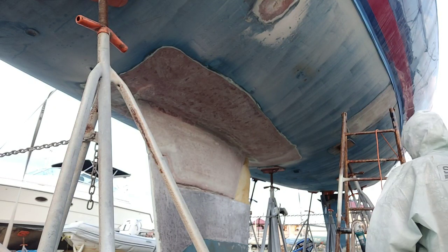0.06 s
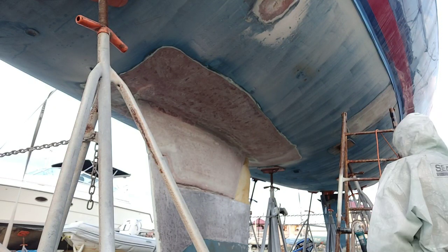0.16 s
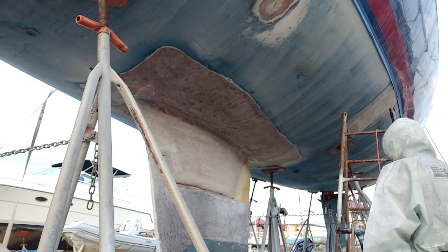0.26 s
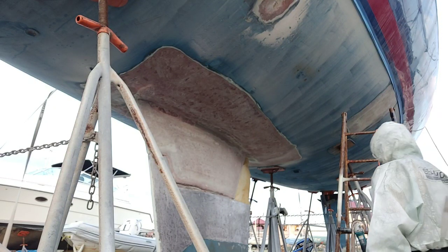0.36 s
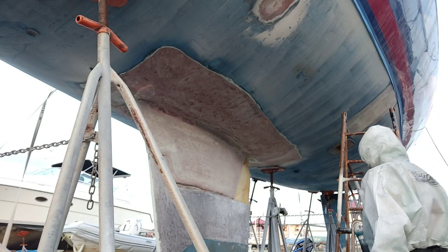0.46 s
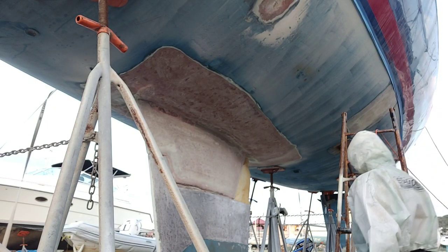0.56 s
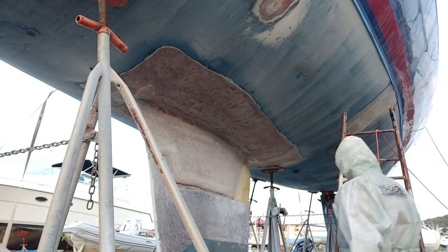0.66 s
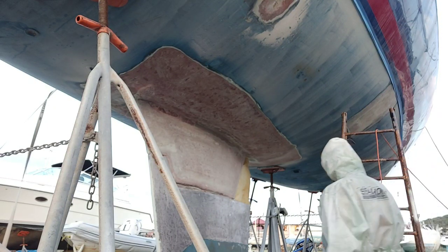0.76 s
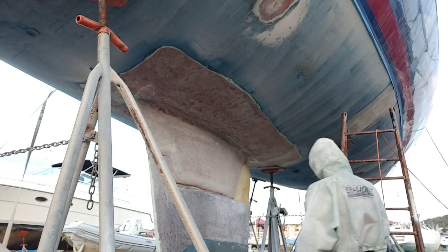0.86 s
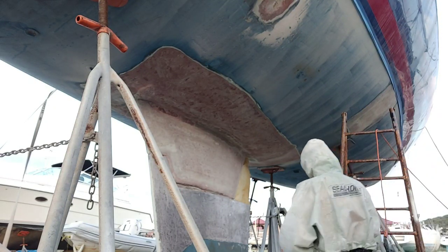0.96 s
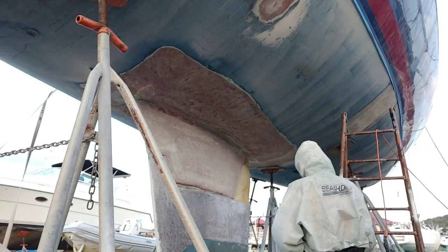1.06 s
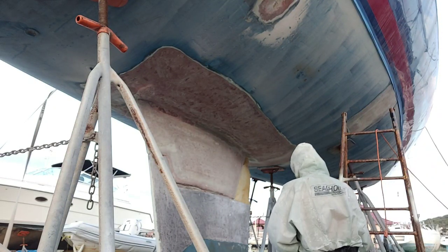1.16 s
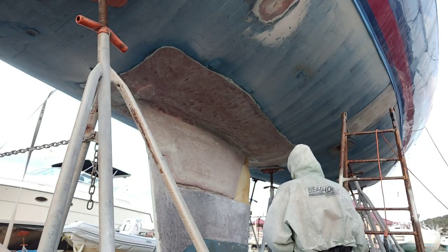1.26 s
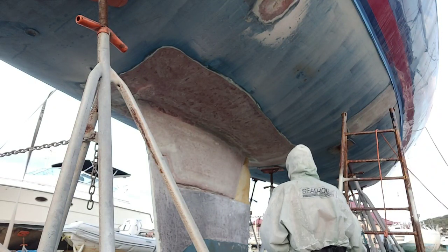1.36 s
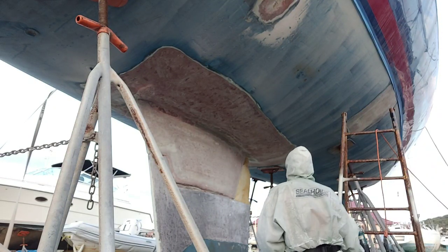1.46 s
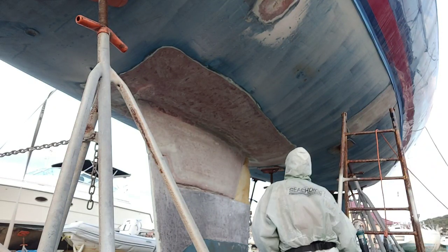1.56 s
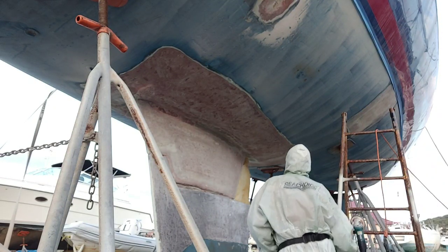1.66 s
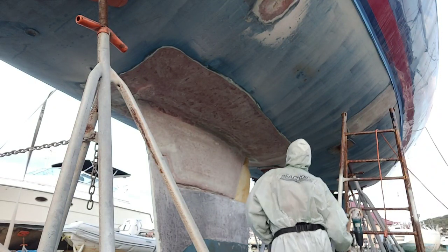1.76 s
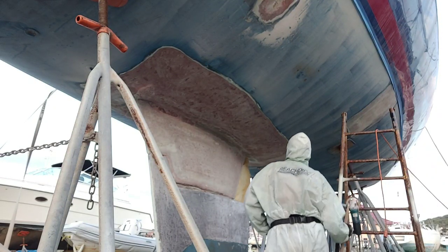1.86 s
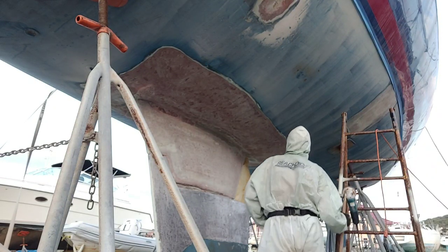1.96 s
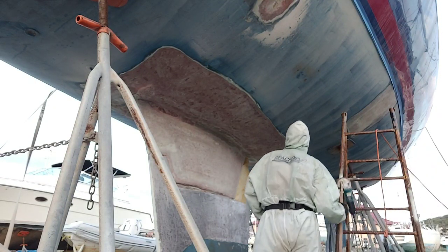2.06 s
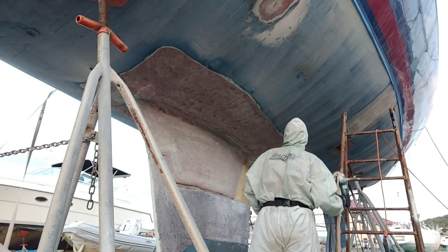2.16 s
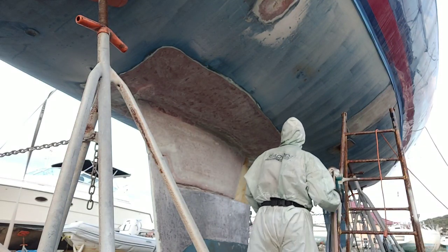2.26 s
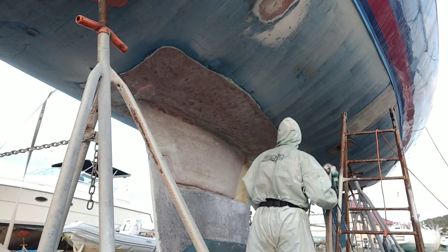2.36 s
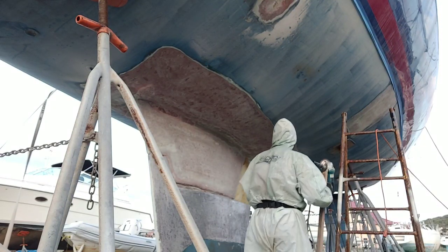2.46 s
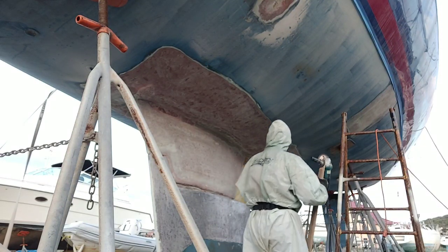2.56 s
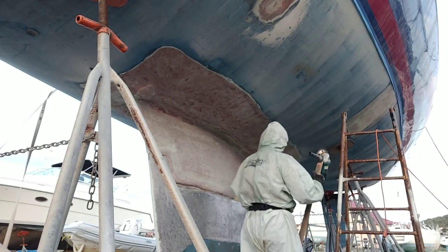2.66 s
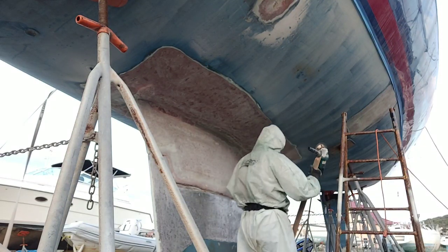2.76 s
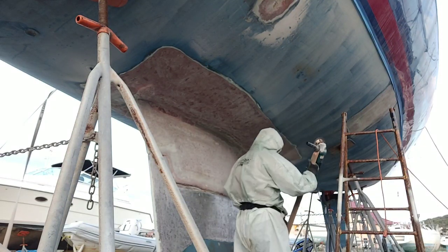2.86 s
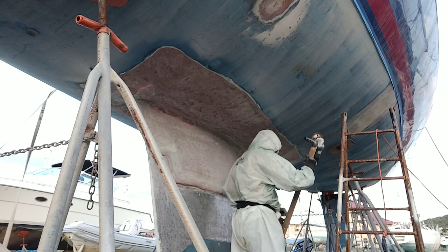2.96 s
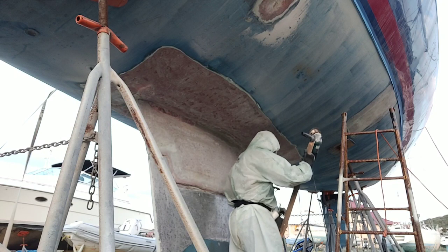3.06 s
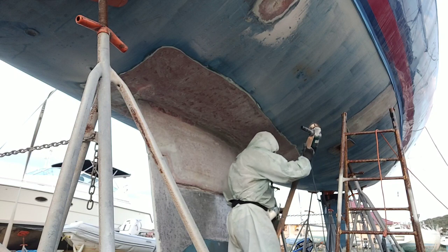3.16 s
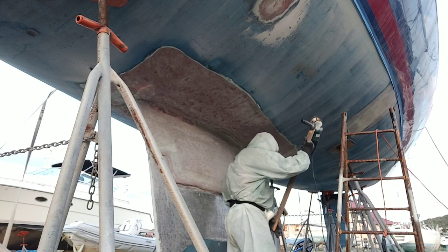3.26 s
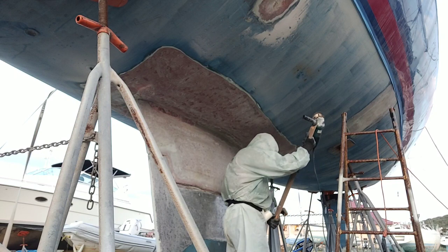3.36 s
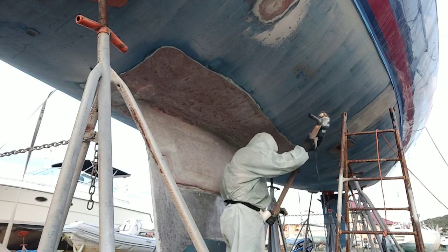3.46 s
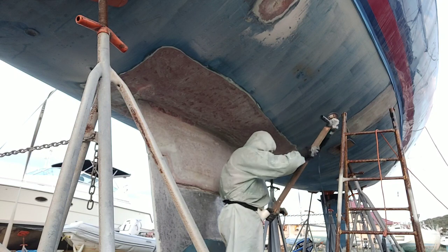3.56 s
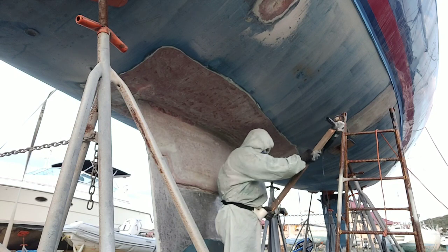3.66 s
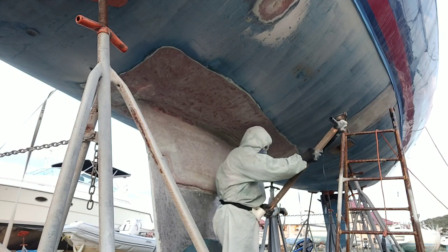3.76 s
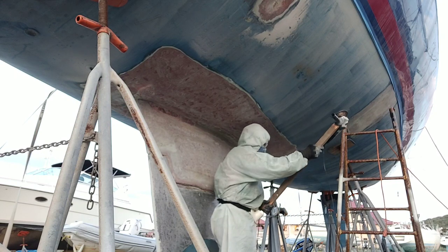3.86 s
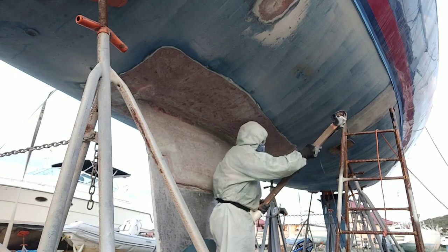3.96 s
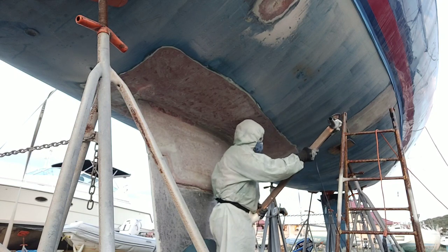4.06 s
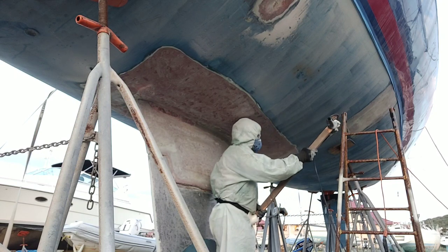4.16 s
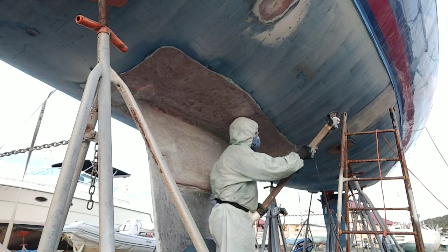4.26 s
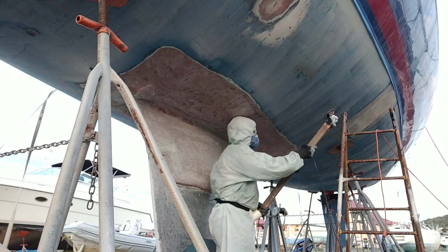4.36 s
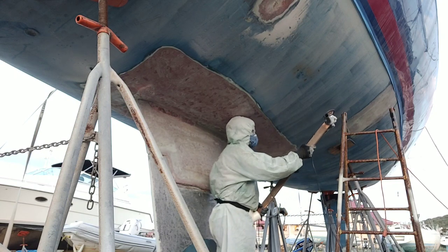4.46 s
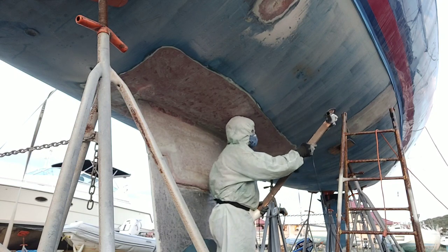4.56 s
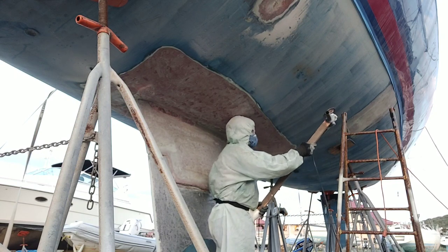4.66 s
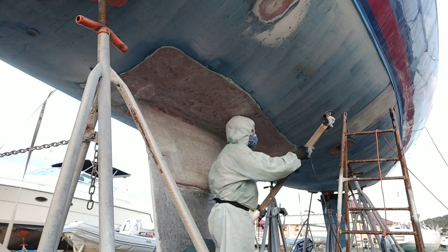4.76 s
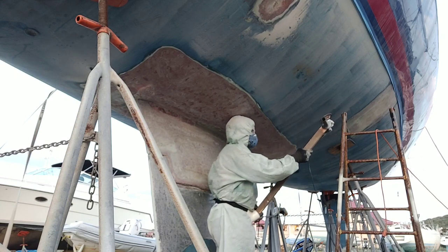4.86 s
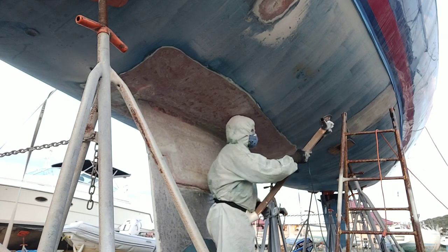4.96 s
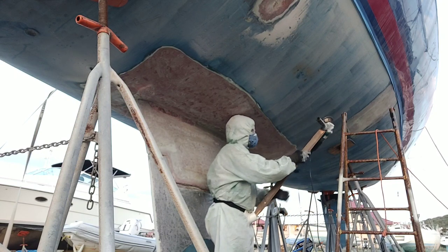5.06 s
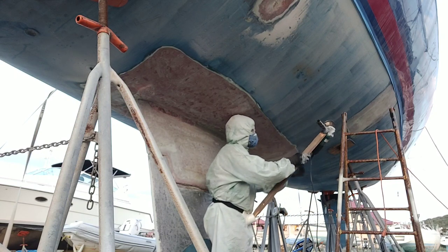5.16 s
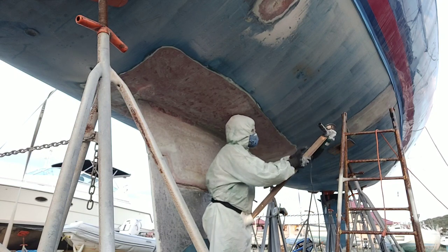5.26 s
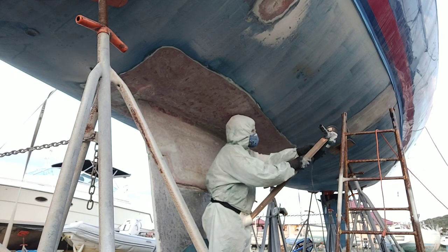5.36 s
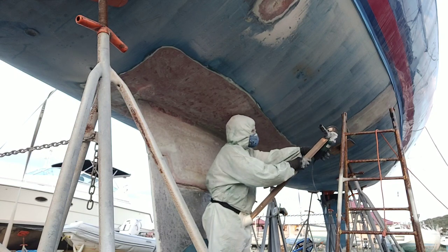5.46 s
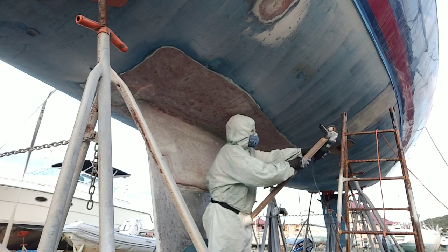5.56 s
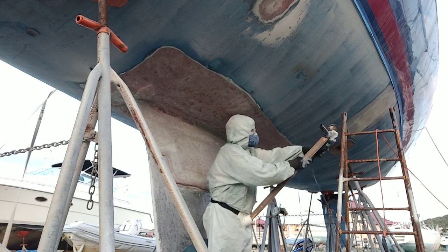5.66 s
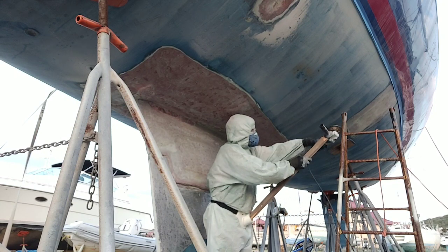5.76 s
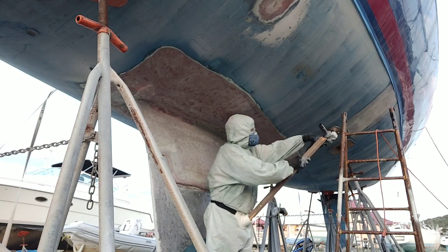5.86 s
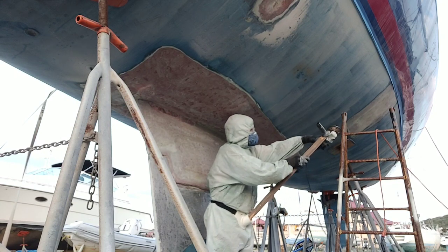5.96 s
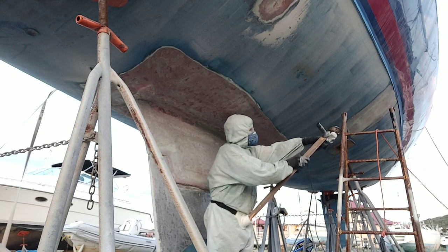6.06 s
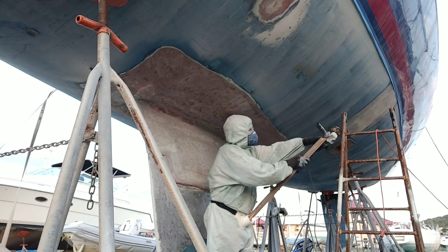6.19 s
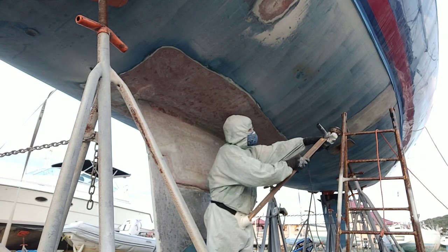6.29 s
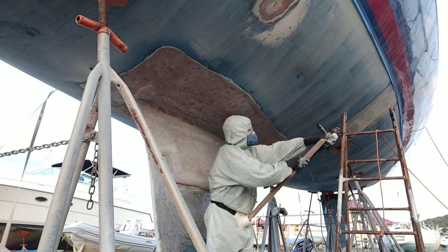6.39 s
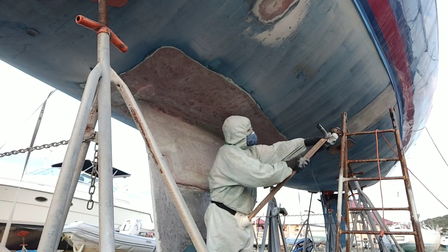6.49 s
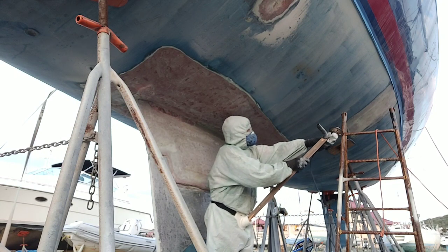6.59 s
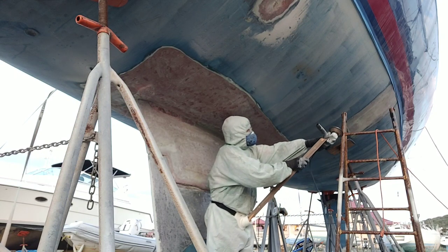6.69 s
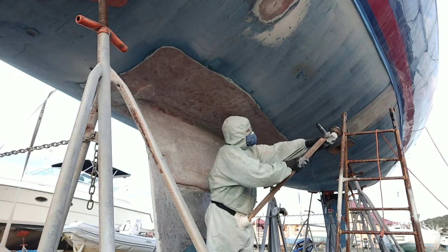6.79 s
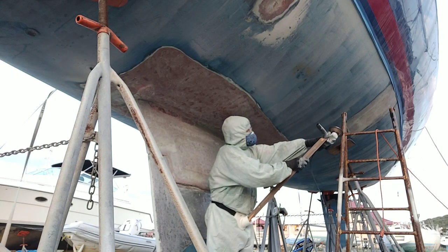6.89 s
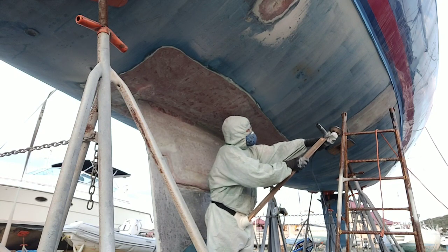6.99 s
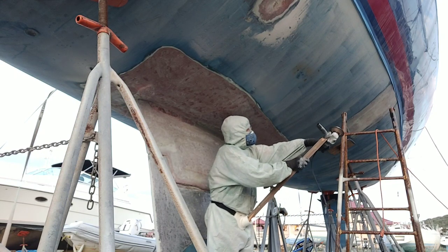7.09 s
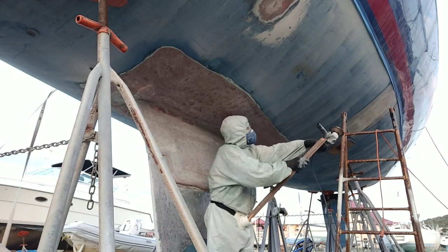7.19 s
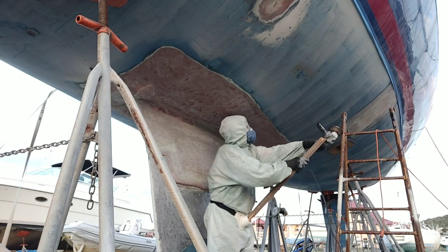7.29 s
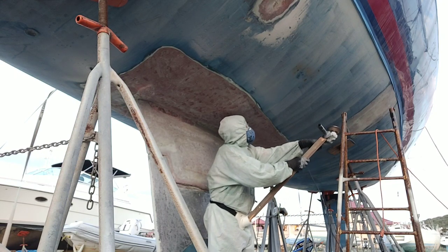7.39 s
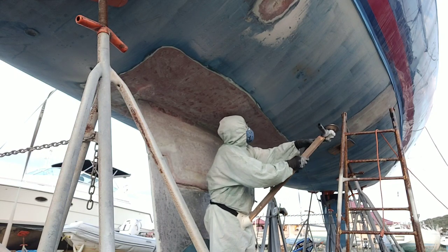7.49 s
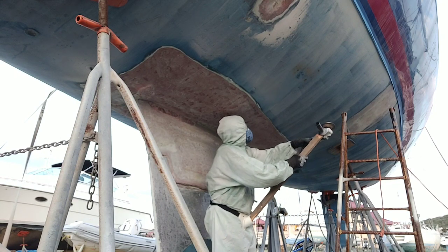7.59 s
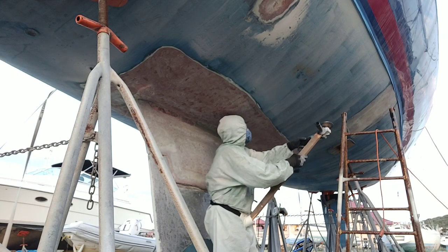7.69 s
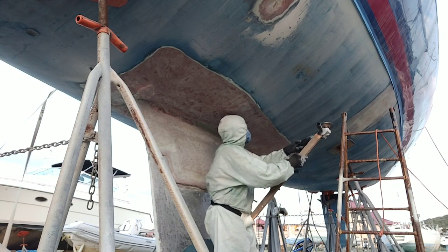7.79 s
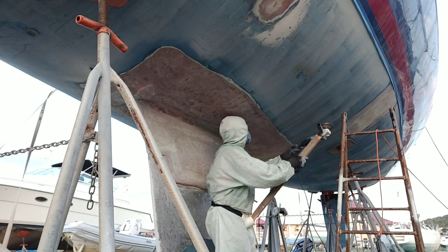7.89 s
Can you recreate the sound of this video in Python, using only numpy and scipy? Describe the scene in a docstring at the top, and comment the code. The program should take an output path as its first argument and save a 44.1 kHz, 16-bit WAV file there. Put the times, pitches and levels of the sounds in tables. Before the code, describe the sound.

Very quiet open boatyard beneath a hull: soft distant rumble and thin hiss. Around 0.7-0.9 s faint taps mix with soft footfalls and a rustle of overalls. A clearer woody knock comes at 1.4 s, then a loose steel part clinks in a quick bouncing cluster at 1.55-1.65 s, ringing bright and short. At about 2.5 s a firm double knock on the pole lands with a low thud, followed by a lighter tick and steps near 3 s. Duller knocks follow at 4.0 and 4.4 s, with weak taps to 4.8 s and a tiny scuff at 5.2 s. The background swells slightly from 6 s. At 6.7 s a switch snaps and the grinder erupts, enormously louder: pulsing, rattling gears and ringing metal, a brief squeal, then the clatter drops after 7.3 s as a shrill rushing whine climbs, running until the cut near 7.9 s.

```python
"""A boat yard, under a hull: a worker walks about with an angle grinder tied to a wooden pole.
Knocks are noise bursts ringing the pole, a loose steel part clinks as decaying modes, steps are thuds and swishes.
Switched on, the grinder clatters as torque pulses drive noise through its resonances, then winds up
into a shrill rush of gear noise, air and tones that climb with the motor.
Sparse echoes throw tool and knocks back from the hull, over far rumble and thin hiss."""
import sys
import numpy as np
from scipy import signal
from scipy.fft import rfft, irfft
from scipy.io import wavfile

SR = 44100
rng = np.random.default_rng(int(sys.argv[2]) if len(sys.argv) > 2 else 0)


def waveform_to_disk(signal):
    """Save audio, clipped to [-1, 1], as 16-bit WAV at the path in sys.argv[1]."""
    frames = np.transpose(np.atleast_2d(signal))
    scaled = np.clip(frames, -1, 1) * 32767
    samples = np.round(scaled).astype(np.int16)
    wavfile.write(sys.argv[1], SR, samples)


N = 349713
TIME = np.arange(N) / SR
FREQS = np.maximum(np.fft.rfftfreq(N, 1 / SR), 1)
SWITCH_ON_S, MAINS_HZ = 6.697, 60
INRUSH_S = 0.4  # decay time constant of the starting current


def from_db(db):
    """Decibels to gain."""
    return 10 ** (np.asarray(db) / 20)


def rms_one(x):
    """Scale to unit power."""
    return x / np.sqrt(np.mean(np.abs(x) ** 2) + 1e-20)


def in_time(rows):
    """Draw a curve of (time [s], value) at every sample."""
    return np.interp(TIME, *np.transpose(rows))


def colour(x, spectrum):
    """Give a steady sound a spectrum, at unit power."""
    hz, db = np.transpose(spectrum)
    gain = from_db(np.interp(np.log(FREQS), np.log(hz), db))
    return rms_one(irfft(rfft(x) * gain, N))


def band(x, low_hz, high_hz, order=2):
    """Causal band-pass."""
    edges = [low_hz, min(high_hz, SR * 0.45)]
    return signal.sosfilt(signal.butter(order, edges, "band", fs=SR, output="sos"), x)


def drift(rate):
    """Smooth random wander with unit spread; rate in Hz."""
    control_rate = 4000
    r = np.exp(-2 * np.pi * rate / control_rate)
    slow = signal.lfilter([1], [1, -2 * r, r * r], rng.standard_normal(40000))
    slow = rms_one(slow[-32000:])  # drop the filter's settling
    return np.interp(TIME, np.arange(len(slow)) / control_rate, slow)


def resonate(x, modes):
    """Ring parallel resonances of alternating sign."""
    out = 0
    for k, (hz, width, db) in enumerate(modes):
        r = np.exp(-np.pi * width / SR)
        zeros = np.array([1, 0, -1]) * (1 - r * r) / 2
        poles = [1, -2 * r * np.cos(2 * np.pi * hz / SR), r * r]
        out = out + (-1) ** k * from_db(db) * signal.lfilter(zeros, poles, x + 1e-18)
    return out


# Motor run-up, a quick kick and a slow climb: (speed gained [turns/s], time constant [s])
SPIN_UP = [(156, .095), (394, .4)]


def motor_speed(running):
    """Turns per second, closing on free speed as two exponential approaches."""
    return sum(gain * (1 - np.exp(-running / lag_s)) for gain, lag_s in SPIN_UP)


def impacts(turns, surge, depth, spread_db, per_turn=0.07):
    """Dense tooth contacts of uneven strength, harder at each surge of torque and once a turn."""
    sizes = rng.standard_normal(N) * from_db(spread_db * drift(270))
    return sizes * (1 + depth * surge) * (1 + per_turn * np.cos(2 * np.pi * turns))


# Low clatter over time, before trim: (time [s], level [dB])
CLATTER_LEVEL = [(6.72, -12), (6.818, -18), (6.874, -18.5), (7.048, -25), (7.3, -25.5), (7.33, -43),
                 (7.514, -56), (7.534, -36.5), (7.9, -31)]
# Spectrum of the clatter: (frequency [Hz], relative density [dB/Hz])
CLATTER_SPECTRUM = [(60, -27.5), (150, -29), (300, -10.5), (450, 1.5), (620, 3.5), (1000, -0.5),
                    (1800, -8.5), (2600, -5.5), (4000, -42), (9000, -31), (15000, -61)]
# Resonances of the disc: (frequency [Hz], width [Hz], relative gain [dB])
DISC_MODES = [(447, 14, -6), (499, 16, -14), (592, 13, 2), (693, 13, -8), (750, 140, -11), (1580, 60, -1.5),
              (1940, 46, -4), (2490, 40, -8)]


def gear_clatter(turns, surge, current, clatter_db=1, disc_db=-3):
    """Torque pulses rattle the gears and shake the disc into ringing."""
    rattle = impacts(turns, surge, depth=7, spread_db=1)
    shake = impacts(turns, surge, depth=7, spread_db=1)
    body = from_db(clatter_db) * colour(rattle, CLATTER_SPECTRUM)
    disc = from_db(disc_db) * rms_one(resonate(shake, DISC_MODES))
    # held back while the starting current is high
    return from_db(in_time(CLATTER_LEVEL)) / (1 + 2 * current) * (body + disc)


# Housing ring over time, before trim: (time [s], level [dB])
HOUSING_LEVEL = [(6.72, -15.5), (6.762, -13.5), (6.782, -19), (6.844, -24), (6.884, -16), (6.93, -26),
                 (7.498, -20), (7.57, -40), (7.9, -45)]
# Resonances of the housing: (frequency [Hz], width [Hz], relative gain [dB])
HOUSING_MODES = [(2920, 80, 2), (3410, 27, -4.5)]


def housing_ring(mesh, trim_db=-2.0):
    """Tooth contacts ring the housing, with a restless level."""
    ring = rms_one(band(resonate(mesh, HOUSING_MODES), 2100, 3700))
    return from_db(in_time(HOUSING_LEVEL)) * from_db(trim_db + 1.1 * drift(30)) * ring


# Gear hiss and squeal over time, before trims: (time [s], level [dB])
GEAR_LEVEL = [(6.72, -16), (6.8, -14), (6.84, -15), (6.9, -12.5), (7.0, -12.5), (7.07, -16.5), (7.54, -19),
              (7.62, -17), (7.899, -12.5)]
# Resonances of the gear hiss: (frequency [Hz], width [Hz], relative gain [dB])
GEAR_MODES = [(4910, 44, -4.5), (5585, 33, -1.5), (5850, 99, -3), (6300, 170, 2.5), (6560, 270, -3),
              (7000, 360, -9.5)]
# Resonances of the squeal: (frequency [Hz], width [Hz], relative gain [dB])
SQUEAL_MODES = [(5200, 38, 12), (5450, 40, 23), (8070, 270, 3), (9140, 92, 1), (9730, 140, -5),
                (12000, 110, -3.5), (13150, 160, -2)]


def gear_noise(mesh, running, hiss_db=-2, squeal_db=-11):
    """Tooth contacts hiss through gear resonances; a squeal swells and fades early in the run-up."""
    level = from_db(in_time(GEAR_LEVEL))
    hiss = rms_one(band(resonate(mesh, GEAR_MODES), 4330, 7470, order=3))
    hiss = hiss * from_db(hiss_db + 1.6 * drift(39))
    swell = np.exp(-0.5 * ((running - 0.2) / 0.18) ** 2)
    squeal = rms_one(band(resonate(mesh, SQUEAL_MODES), 4400, 12300))
    return level * (hiss + swell * from_db(squeal_db) * squeal)


def narrow_band(turns, multiple, width):
    """A wavering line that climbs with the motor."""
    phase = 2 * np.pi * multiple * turns
    return (drift(width) * np.cos(phase) + drift(width) * np.sin(phase)) / np.sqrt(2)


# Overall air level by motor speed: (speed [turns/s], level [dB])
RUSH_BY_SPEED = [(0, -15), (280, -21), (410, -17), (505, -15.5), (532, -19)]
# Spectrum of the broad rush: (frequency [Hz], relative density [dB/Hz])
RUSH_SPECTRUM = [(80, -32), (200, -15), (450, -10.5), (1000, -12), (2000, -4.5), (3500, -1), (5000, 0),
                 (7000, -3.5), (8000, -13.5), (10000, -24.5), (15500, -32.5)]
# Bands of fan air: (multiple of motor speed, full-speed level within the air [dB], wander rate [Hz])
AIR_BANDS = [(7.1, -37, 190), (11.6, -3.5, 700)]


def cooling_air(speed, turns, surge, rush_db=-2.0):
    """A broad rush of air, with fan bands that climb and grow with speed."""
    air = from_db(rush_db) * colour(impacts(turns, surge, depth=0.76, spread_db=2.0), RUSH_SPECTRUM)
    fan = sum(from_db(db) * narrow_band(turns, multiple, width) for multiple, db, width in AIR_BANDS)
    level = from_db(np.interp(speed, *np.transpose(RUSH_BY_SPEED)))
    return level * (air + speed / speed.max() * fan)


# Tones of shaft, fan and gears: (multiple of motor speed, relative level [dB], wander rate [Hz])
TONES = [(0.34, -9.5, 53), (0.87, -7.5, 3.1), (1.08, -14, 2.2), (1.32, -7.5, 4.3), (2.2, 2.5, 59),
         (3.0, -3, 77), (6.0, -7, 48), (7.1, -0.5, 143), (9.7, -3.5, 79), (10.4, -1.5, 51),
         (12.0, -6.5, 30)]
# Tool resonances every tone climbs through: (frequency [Hz], width [Hz], gain [dB])
TOOL_RESONANCES = [(145, 14.5, -37.5), (547, 170, -27.5), (1434, 240, -26.5), (2910, 240, -20.5),
                   (3503, 286, -20), (4250, 440, -21.5), (4900, 220, -23), (5620, 230, -11.5)]
EASE_TURNS_PER_S = 48  # this close to free speed the gears unload and their tones fade


def tones(speed, turns, rough=1.0):
    """Rotating parts sing while the motor pulls, swelling where their pitch meets a resonance."""
    pitches = np.arange(0, 8000, 5)
    response = sum(from_db(peak_db) / np.sqrt(1 + (2 * (pitches - hz) / span) ** 4)
                   for hz, span, peak_db in TOOL_RESONANCES)
    out = 0
    for multiple, db, width in TONES:
        line = np.cos(2 * np.pi * multiple * turns + 1.64 * drift(width))
        line = line + rough * narrow_band(turns, multiple, width)
        out = out + from_db(db) * line * np.interp(multiple * speed, pitches, response)
    free_speed = sum(gain for gain, _ in SPIN_UP)
    pull = np.minimum((free_speed - speed) / EASE_TURNS_PER_S, 1)
    return out * np.sqrt(speed / free_speed) * pull


def commutator_whistle(turns, level_db=-41):
    """The 32 commutator bars sing a thin rising whistle."""
    bars = np.sin(2 * np.pi * 32 * turns + 1.2 * drift(60))
    return from_db(level_db + 2 * drift(30)) * bars


def grinder():
    """Starting torque pulses twice a mains cycle, then eases as the motor winds up."""
    running = np.maximum(TIME - SWITCH_ON_S, 0)
    speed = motor_speed(running)
    turns = np.cumsum(speed) / SR
    current = np.exp(-running / INRUSH_S)
    surge = current * np.cos(2 * np.pi * MAINS_HZ * (running - 0.0017)) ** 8
    mesh = impacts(turns, surge, depth=0.7, spread_db=1.5)
    out = gear_clatter(turns, surge, current) + housing_ring(mesh)
    out *= 1 - np.exp(-running / 0.0022)  # the torque takes hold after the switch closes
    out += gear_noise(mesh, running)
    out += cooling_air(speed, turns, surge)
    out += tones(speed, turns)
    out += commutator_whistle(turns)
    return band(out * np.clip(running / 0.00052, 0, 1), 91, 18000, order=3)


# Handling knocks, ending with the snap of the switch: (time [s], body level [dB],
# pitch of the struck spot [Hz], fall above that pitch [dB/octave], hard tick level [dB])
KNOCKS = [(0.675, -70, 1480, 3, -65), (0.707, -46.5, 3840, 12, -52), (0.847, -58, 1430, 15, -77),
          (1.363, -39, 1174, -3.5, -44.5), (2.469, -39.5, 734, 0.5, -50.5), (2.483, -31, 724, 2.5, -40.5),
          (2.94, -52.5, 2110, -2, -45), (4.016, -34, 605, 8, -44.5), (4.368, -40.5, 710, 7.5, -47),
          (4.613, -66.5, 736, 3, -80), (4.827, -53.5, 491, 9, -68), (6.692, -44.5, 3100, 10, -34)]
# Resonances of the wooden pole: (frequency [Hz], width [Hz], gain before trim [dB])
POLE_MODES = [(305, 9, 6.5), (680, 330, 12.5), (1120, 38, -17), (1510, 20, -43), (1870, 240, -2),
              (1960, 41, -36), (3250, 190, -7), (5200, 80, -36)]
KNOCK_BASS_DB_PER_OCTAVE = 4.8  # fall below the pitch of the spot
KNOCK_RING_DB = -1  # ring of the spot re the body


def knocks(low_t60=0.13, high_t60=0.087, rise_s=0.002, top_db=-30, mode_db=3, ring_q=15, wobble=0.44):
    """A hard tick over a burst tilted about the spot's pitch rings the pole; treble dies sooner."""
    out, t = np.zeros(N), TIME[:SR // 4]
    edges = np.array([150, 400, 1000, 2300, 6600, 15000])  # three body bands, tick, top
    body_centres = np.sqrt(edges[:3] * edges[1:4])
    decays = np.geomspace(low_t60, high_t60, num=5)
    attack = 1 - np.exp(-t / rise_s)
    early = slice(SR // 40)  # levels are set over the first 25 ms
    for s, body_db, ring_hz, fall, tick_db in KNOCKS:
        octaves = np.log2(body_centres / ring_hz)
        body = body_db - np.maximum(fall * octaves, -KNOCK_BASS_DB_PER_OCTAVE * octaves)
        levels = [*body, tick_db, tick_db + top_db]
        phase = 2 * np.pi * ring_hz * t
        phase = phase + wobble * np.sqrt(ring_hz / 1000) * drift(ring_hz / 6)[:len(t)]
        ring = attack * np.exp(-np.pi * min(ring_hz, 1500) / ring_q * t) * np.sin(phase)
        blow = from_db(body_db + KNOCK_RING_DB) * ring / np.std(ring[early])
        for low, high, db, t60 in zip(edges, edges[1:], levels, decays):
            burst = rng.standard_normal(len(t)) * from_db(-60 * t / t60) * attack
            burst = burst + from_db(mode_db) * resonate(burst, POLE_MODES)
            burst = band(burst, low, high, order=3 if high < edges[-2] else 7)
            blow = blow + from_db(db) * burst / np.std(burst[early])
        at = int(s * SR)
        out[at:at + len(t)] += blow
    return band(out, 88, 19000)


# Bounces of a loose steel part: (time [s], level before trim [dB], ring time as share of the free one)
CLINKS = [(1.5534, -36.5, 0.76), (1.6102, -27, 0.83), (1.6274, -28.5, 0.78), (1.6374, -31, 0.8),
          (1.6504, -43, .9)]
# Modes of the steel: (frequency [Hz], relative level [dB], free 60 dB decay time [s])
STEEL_MODES = [(4150, -4.5, 0.076), (4350, -28, .08), (5136, -5, 0.29), (5200, -6.5, 0.42), (5600, -5, .06),
               (5750, -16, 0.073), (6520, -3, 0.048), (7400, -15, 0.086), (7850, -22, 0.11),
               (10000, -32, 0.057), (11300, -29, .09)]


def clinks(trim_db=-6, crack_db=1):
    """Every touch strikes the steel modes with new strengths, along with a brief crack."""
    out, t = np.zeros(N), TIME[:SR // 2]
    for s, db, share in CLINKS:
        ring = 0
        for hz, mode_db, t60 in STEEL_MODES:
            fading_db = mode_db + rng.normal(0, 0.68) - 60 * t / (t60 * share)
            ring = ring + from_db(fading_db) * np.sin(2 * np.pi * hz * t)
        crack = band(rng.standard_normal(len(t)), 3100, 6600) * np.exp(-t / 0.0061)
        touch = (ring + from_db(crack_db) * crack) * (1 - np.exp(-t / 0.0013))
        at = int(s * SR)
        out[at:at + len(t)] += from_db(db + trim_db) * touch
    return out


# Steps and rustling overalls: (time of peak [s], length as Gaussian sigma [s],
# thud pitch [Hz], thud level [dB], rustle level [dB])
SCUFFS = [(.05, 0.093, 149, -74, -66), (0.81, 0.043, 173, -63, -59), (0.905, 0.045, 127, -56.5, -67),
          (2.358, 0.026, 198, -55, -77), (2.541, 0.027, 302, -42.5, -61), (2.963, 0.03, 145, -61, -74),
          (3.15, 0.0087, 196, -51, -70), (5.195, 0.013, 720, -58, -66)]


def scuffs():
    """Soft footfalls as narrow-band thuds, with a swish of cloth as flickering noise."""
    rustle = band(rng.standard_normal(N), 600, 6700, order=6)
    rustle = rms_one(rustle * from_db(2.6 * drift(60)))
    out = 0
    for s, length, thud_hz, thud_db, rustle_db in SCUFFS:
        thud = rms_one(band(rng.standard_normal(N), thud_hz * 0.76, thud_hz * 1.33, order=3))
        swell = np.exp(-0.5 * ((TIME - s) / length) ** 2)
        out = out + swell * (from_db(thud_db) * thud + from_db(rustle_db) * rustle)
    return out


def hull(x, wet_db, t60):
    """The hull, keel and ground scatter the sound back as a short spray of echoes."""
    t = TIME[:SR // 4]
    sparse = rng.standard_normal(len(t)) * (rng.random(len(t)) < 0.03)
    spray = sparse * from_db(-60 * t / t60) * (t > 0.002)
    return x + from_db(wet_db) * signal.fftconvolve(x, spray / np.linalg.norm(spray))[:N]


# Spectrum of the yard air: (frequency [Hz], relative density [dB/Hz])
YARD_SPECTRUM = [(18, -85), (30, -44), (53, -45), (83, -16.5), (117, -6), (160, -7.5), (202, 0),
                 (315, -0.5), (575, -10.5), (747, -11), (1260, -17.5), (3880, -22), (6540, -15),
                 (8500, -44.5), (15500, -36)]
# Distant rumble over time, before trim: (time [s], level [dB])
RUMBLE_LEVEL = [(0.0, -60.5), (0.6, -67.5), (3.05, -62), (3.9, -67.5), (5.68, -62.5), (6.01, -57.5),
                (6.6, -55.5)]
# Background hiss over time, before trim: (time [s], level [dB])
HISS_LEVEL = [(0.0, -67), (0.42, -71), (2.44, -70.5), (2.63, -66.5), (3.1, -66.5), (3.82, -69.5),
              (4.89, -68.5), (5.88, -62), (6.6, -61.5)]


def yard(rumble_db=1.5, hiss_db=1):
    """Far rumble under a thin hiss: coloured noise split at 1500 Hz, each part with its own level."""
    air = colour(rng.standard_normal(N), YARD_SPECTRUM)
    low = signal.sosfilt(signal.butter(2, 1500, fs=SR, output="sos"), air)
    high = signal.sosfilt(signal.butter(2, 1500, "high", fs=SR, output="sos"), air)
    rumble = from_db(in_time(RUMBLE_LEVEL) + rumble_db + 0.72 * drift(7.6)) * rms_one(low)
    hiss = from_db(in_time(HISS_LEVEL) + hiss_db) * rms_one(high)
    return rumble - hiss


def scene():
    """Grinder and handling under the hull, in the open yard."""
    tool = hull(grinder(), wet_db=-8.5, t60=0.06)
    handling = hull(knocks() + clinks(), wet_db=-11.5, t60=0.13)
    return (tool + handling + scuffs() + yard())[None]


def record(dry):
    """Round the highest peaks and cut the top steeply."""
    cutoff_hz = 15450
    rounded = dry / (1 + (dry / 0.92) ** 6) ** (1 / 6)
    return signal.sosfilt(signal.ellip(10, 0.1, 80, cutoff_hz, fs=SR, output="sos"), rounded)


dry = scene()
out = record(dry)
waveform_to_disk(out)
```